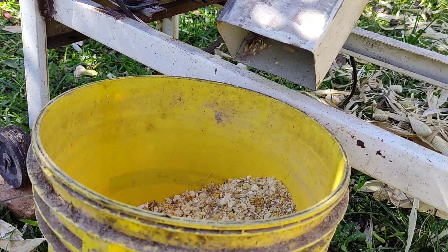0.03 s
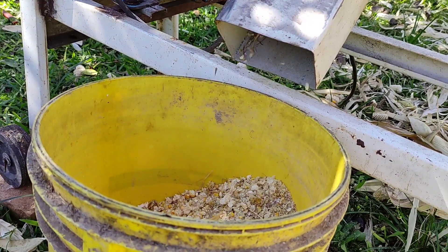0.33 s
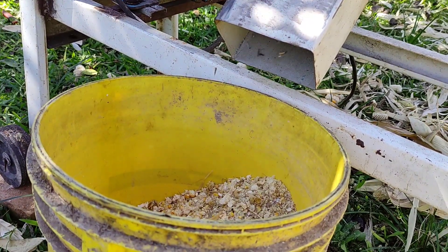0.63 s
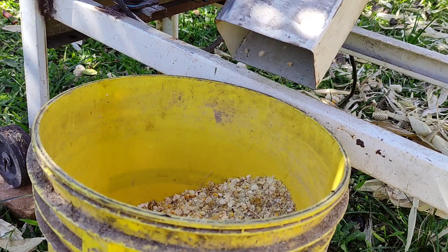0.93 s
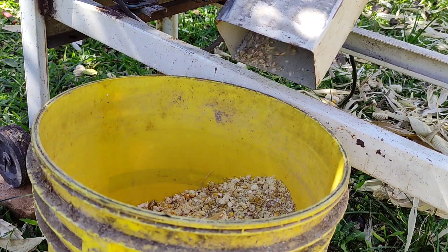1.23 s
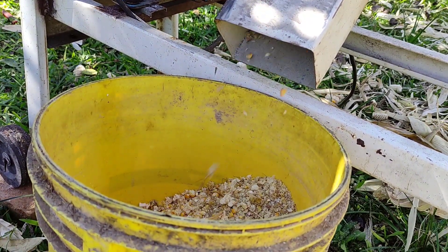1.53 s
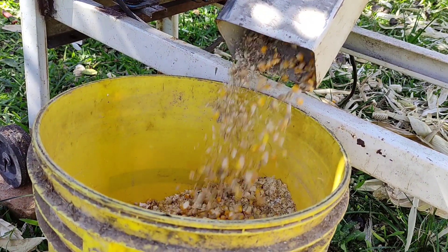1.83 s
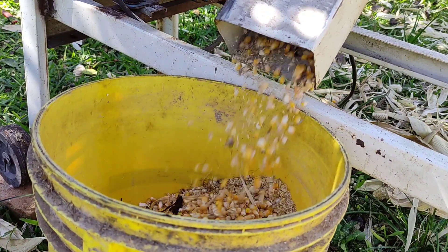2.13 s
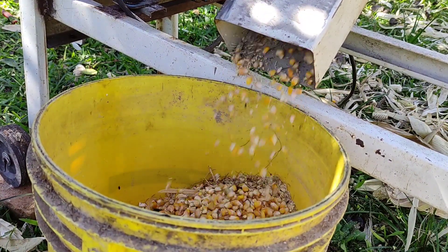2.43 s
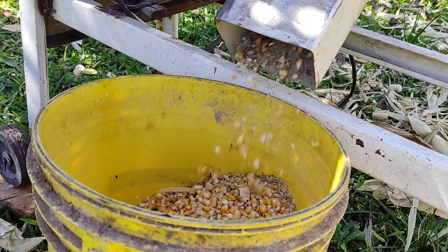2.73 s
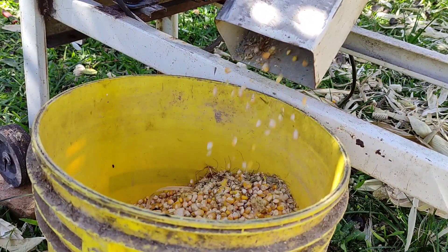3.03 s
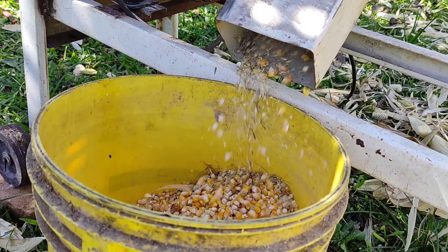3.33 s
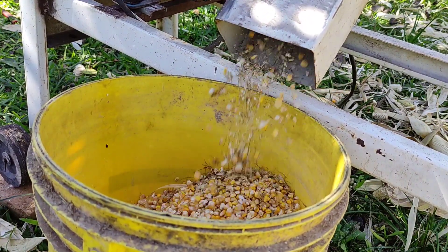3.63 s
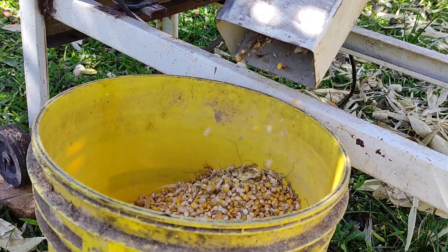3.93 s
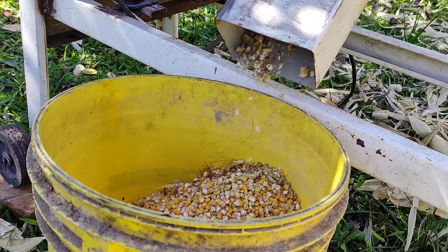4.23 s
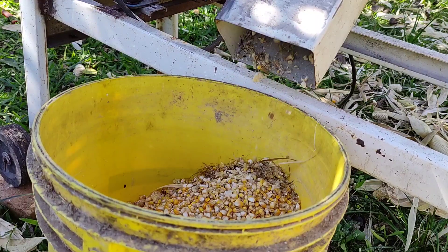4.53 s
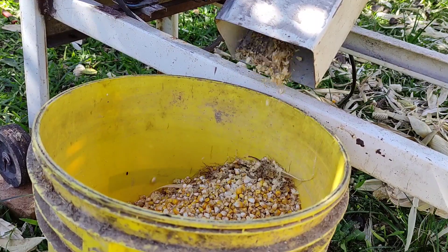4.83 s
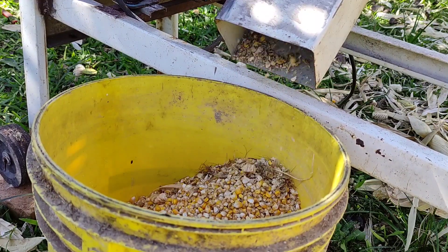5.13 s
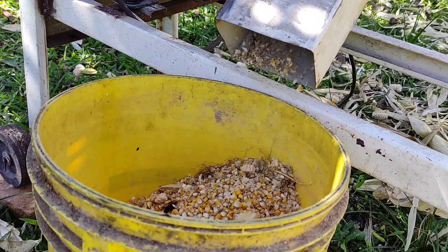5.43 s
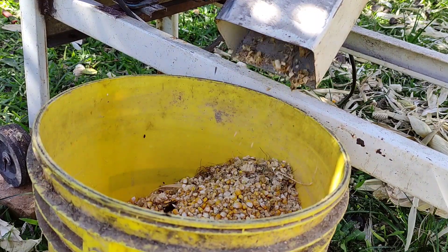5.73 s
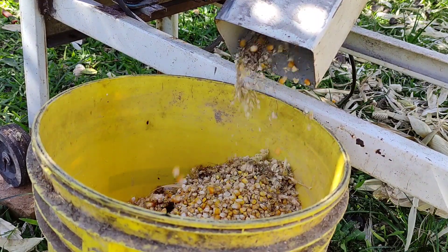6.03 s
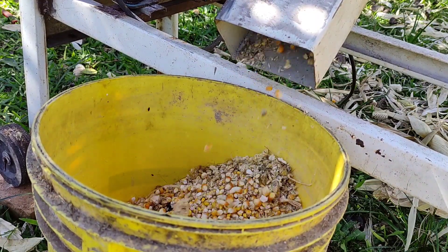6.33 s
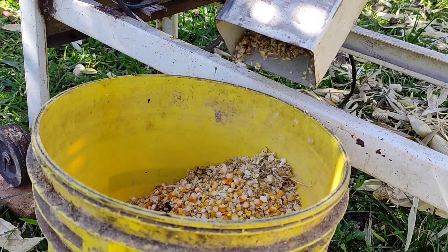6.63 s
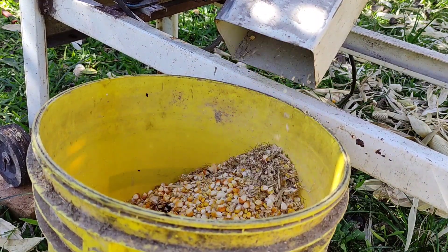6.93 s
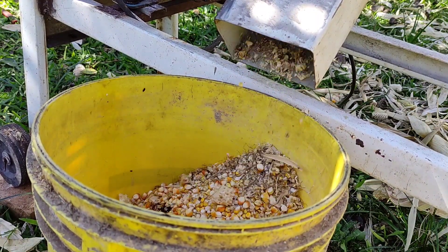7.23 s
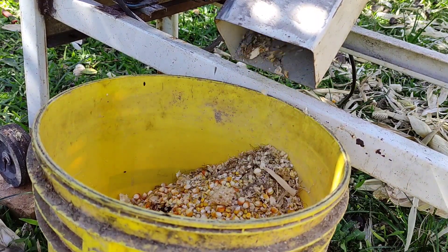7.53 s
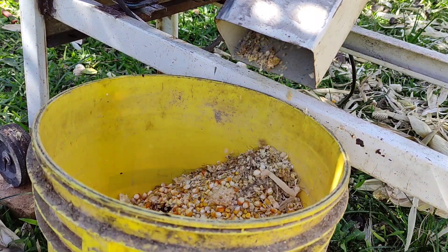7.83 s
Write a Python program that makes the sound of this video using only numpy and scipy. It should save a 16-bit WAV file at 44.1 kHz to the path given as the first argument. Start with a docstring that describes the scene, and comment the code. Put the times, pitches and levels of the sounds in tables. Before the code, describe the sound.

An engine-driven corn sheller runs outdoors, heard from close beside its chute. At first it spins nearly empty, with a fluttering roar and a whirr of sheet-metal panels. Cobs start thumping and clanking inside. Then fresh ears go through: the whirr fades, the roar briefly chokes, and kernels spray down the metal chute into a plastic bucket. More surges follow, with sharp clacks and hollow thuds over the continuing roar.

```python
"""Outdoors, the microphone close beside the chute of an engine-driven corn sheller.
At first the drum spins nearly empty, churning air through its sheet-metal housing in a fluttering roar
while the engine sets the panels whirring. From 0.4 s cobs thump inside, with hard clacks and clanks.
At 1.4 s fresh ears are stripped: grain damps the whirr, rubs the panels into song and briefly chokes
the roar. From then on, surges of kernels clatter and spray down the chute into a plastic bucket."""
import sys
import numpy as np
from scipy import signal
from scipy.fft import rfft, irfft
from scipy.io import wavfile
from scipy.ndimage import uniform_filter1d, minimum_filter1d

SR = 44100
rng = np.random.default_rng(int(sys.argv[2]) if len(sys.argv) > 2 else 0)


def store_pcm(level_fs):
    """Save levels as 16-bit WAV."""
    pcm = np.round(np.clip(level_fs, -1, 1) * 32767).astype(np.int16)
    wavfile.write(sys.argv[1], SR, np.atleast_2d(pcm).T)


N = 347067
T = np.arange(N) / SR
HZ = np.fft.rfftfreq(8192, 1 / SR)


def gain_of(db):
    """Decibels to gain."""
    return 10 ** (np.asarray(db) / 20)


def unit_rms(x):
    """Scales to rms 1."""
    return x / np.sqrt(np.mean(x ** 2) + 1e-20)


def spectrum(points):
    """Gain at every frequency, drawn through (Hz, dB) points."""
    hz, db = np.transpose(points)
    return gain_of(np.interp(np.log(HZ + 1), np.log(hz), db))


def resonance(hz, width_hz):
    """Gain of one resonance, 1 at its centre."""
    return 1 / (1 + (2 * (HZ - hz) / width_hz) ** 2)


def add(mix, start_s, sound):
    """Mixes a sound in at a given time."""
    part = mix[max(round(start_s * SR), 0):][:len(sound)]
    part += sound[:len(part)]


def ring(x, gain):
    """Minimum-phase filter with the given gain: every blow rings after it lands."""
    log_gain = np.log(np.maximum(np.r_[gain, gain[-2:0:-1]], 1e-5))
    response = np.exp(np.conj(signal.hilbert(log_gain)))
    taps = np.fft.ifft(response).real[:len(HZ)]
    return signal.oaconvolve(x, taps)[:len(x)]


def wander(hz):
    """Random drift of rms 1, up to about the given rate."""
    lowpass = np.exp(-(np.fft.rfftfreq(N, 1 / SR) / hz) ** 2)
    return unit_rms(irfft(rfft(rng.standard_normal(N)) * lowpass, N))


def flutter(depth_db, hz=43.075, crest_s=0.0083):
    """A fast, even flutter in the level, shared by air and grain."""
    return gain_of(depth_db * np.cos(2 * np.pi * hz * (T - crest_s)))


def impacts(per_s, spread_db):
    """Blows of random size at random moments."""
    size = gain_of(spread_db * np.minimum(rng.exponential(1, N), 4))
    lands = rng.random(N) < per_s / SR
    return unit_rms(size * rng.choice([-1, 1], N) * lands)


def burst(body, rise_s, length_s):
    """A quick cluster of contacts ringing a body, with peak 1."""
    t = T[:SR // 4]
    envelope = (1 - np.exp(-t / rise_s)) * np.exp(-(t / length_s) ** 2)
    sound = ring(rng.standard_normal(len(t)) * envelope, body)
    return sound / abs(sound).max()


def strike(rows, body, rise_s, length_s):
    """One burst for each row that begins with a start in seconds and a level in dB."""
    out = np.zeros(N)
    for start_s, db, *_ in rows:
        add(out, start_s, gain_of(db) * burst(body, rise_s, length_s))
    return out


# The housing's resonances. Each row: frequency in Hz, width in Hz, relative level in dB.
HOUSING_MODES = [(110, 55, -18), (253.5, 61, 1), (297, 50, -1), (356.4, 80, -7), (497, 91, -10),
                 (598.4, 80, -5.5), (677, 100, -8), (759, 67, -10), (883, 123, -7), (973, 62, -13.5),
                 (1160, 150, -19)]

def housing():
    """Gain of the booming sheet-metal housing: its resonances add in power."""
    return np.sqrt(sum((gain_of(db) * resonance(hz, width)) ** 2 for hz, width, db in HOUSING_MODES))


# The rush of air between the resonances. Each row: frequency in Hz, relative level in dB.
AIR_SPECTRUM = [(20, -55), (45, -35), (75, -12.5), (170, -11), (450, -11.5), (900, -15), (1060, -21),
                (1400, -23), (2000, -27), (3200, -42.5), (7500, -47.5)]

def drum(open_share, drone_db=-31, roar_db=-23.12, split_hz=340):
    """The drum churns air through the housing: a low drone, and above it a roar that grain can choke."""
    body = np.hypot(housing(), spectrum(AIR_SPECTRUM))
    low_share = 1 / (1 + (HZ / split_hz) ** 8)
    churn = rng.standard_normal(N) * flutter(depth_db=4)
    drone = unit_rms(ring(churn, body * np.sqrt(low_share)))
    puffs = impacts(per_s=3500, spread_db=2) * flutter(depth_db=1) * gain_of(0.97 * wander(hz=40))
    roar = unit_rms(ring(puffs, body * np.sqrt(1 - low_share)))
    return gain_of(drone_db) * drone + gain_of(roar_db) * open_share * roar


# Tones of the empty drum. Each row: frequency in Hz, width in Hz, level in dB.
DRUM_TONES = [(105, 54, -40), (269, 34, -32.5), (375, 33, -33), (640, 38, -45.5), (875, 27, -41.5),
              (1080, 70, -54.5), (7170, 230, -57)]

def hum(fill):
    """The nearly empty drum hums and whistles in narrow, wavering tones until grain damps them."""
    tones = sum(gain_of(db) * unit_rms(ring(rng.standard_normal(N), resonance(hz, width)))
                for hz, width, db in DRUM_TONES)
    return tones * (1 - fill) ** 2


# The engine sags as the ears go in. Each row: time in seconds, firings per second.
FIRING_RATE = [(0, 65.7), (.35, 64.8), (.75, 65.05), (.9, 63.7), (1.17, 64.1), (1.37, 64.9), (1.5, 63)]
# Tones shaken from the empty housing. Each row: multiple of the firing rate, level in dB.
WHIRR_ORDERS = [(4, -31.5), (6, -39.5), (9, -35.5), (10, -39.5), (12, -34), (13, -42), (14, -36.5)]

def whirr(fill, waver_db=1.4, slip_rad=0.4):
    """The engine shakes loose panels at multiples of its firing rate until grain weighs them down."""
    firing_phase = 2 * np.pi * np.cumsum(np.interp(T, *np.transpose(FIRING_RATE))) / SR
    tones = np.zeros(N)
    for order, db in WHIRR_ORDERS:
        waver = gain_of(waver_db * wander(hz=9))
        phase = order * firing_phase + slip_rad * wander(hz=30)
        tones += gain_of(db) * unit_rms(waver * np.sin(phase))
    return tones * (1 - fill) ** 2


def cob_blow(soft_hz, low_hz):
    """Gain of the housing under a soft cob, which drives mainly the low panel resonance."""
    softness = 1 / np.sqrt(1 + (HZ / soft_hz) ** 4)
    low_cut = HZ ** 2 / (HZ ** 2 + low_hz ** 2)
    return housing() * softness * low_cut


def tumbling_cobs(loudness, open_share, level_db=-29.5):
    """Cobs rumble round inside the drum, cushioned a little by a heavy flow of grain."""
    rumble = unit_rms(ring(impacts(per_s=350, spread_db=1.5), cob_blow(soft_hz=278, low_hz=270)))
    return gain_of(level_db) * loudness * open_share ** 0.13 * rumble


# Kernels striking sheet steel. Each row: frequency in Hz, relative level in dB.
STEEL_SPECTRUM = [(150, -25), (450, 3.5), (900, 1.5), (1060, 0.5), (1250, 1.5), (1480, -2.5), (1850, -2),
                  (2350, -6), (2900, -11), (3500, -15), (5000, -20), (7500, -16)]
# Kernels and chaff skittering over each other. Each row: frequency in Hz, relative level in dB.
SKITTER_SPECTRUM = [(500, -20.5), (1300, -15.5), (1580, -2), (1900, -7.5), (2300, 2), (2600, -0.5),
                    (2900, -4), (3400, -2.5), (4300, -5), (5500, -1.5), (6500, 0.5), (7500, 3.5)]

def kernels(loudness, flow, fill):
    """Kernels leave the drum in clumps, strike the steel and skitter down the chute close by."""
    clumps = gain_of(1.55 * wander(hz=34) * fill)
    strikes = impacts(per_s=6000, spread_db=1.9) * flutter(depth_db=1.44) * clumps
    grazes = impacts(per_s=6000, spread_db=-0.5) * flutter(depth_db=1.7) * clumps
    clatter = unit_rms(ring(strikes, spectrum(STEEL_SPECTRUM)))
    spray = unit_rms(ring(grazes, spectrum(SKITTER_SPECTRUM)))
    return loudness * gain_of(-32.5 + 7 * fill) * clatter + flow * gain_of(8.5 + 2 * fill) * spray


def bucket(flow, body_hz=140, level_db=-33, heap_db_per_s=1.47):
    """The stream of grain drums dully on the chute and the plastic bucket, less as the heap grows."""
    body = np.minimum(HZ / body_hz, 1) * resonance(body_hz, width_hz=150)
    level = gain_of(level_db - heap_db_per_s * T) * (flow / flow.max()) ** 0.33
    return level * unit_rms(ring(impacts(per_s=900, spread_db=1.5), body))


# The largest handfuls of kernels. Each row: start in seconds, clack level in dB, splash level in dB.
HANDFULS = [(.423, -28, -33), (.724, -21, -38), (.749, -20, -38), (1.462, -22, -16), (2.325, -16, -25),
            (2.492, -24, -19), (2.649, -15, -26), (2.93, -22, -18.5), (3.79, -17, -30), (3.977, -15.5, -22),
            (4.182, -16, -29), (4.212, -16, -25), (4.25, -12, -20), (4.324, -10.5, -20.5),
            (4.415, -16, -24), (4.572, -12.5, -25), (4.792, -15, -22), (4.829, -15.5, -28),
            (4.855, -11, -24), (4.995, -15, -21), (5.16, -16.5, -22), (5.319, -7.7, -20),
            (5.502, -15.5, -28), (5.604, -12.5, -23), (5.645, -13, -25), (5.761, -15, -21),
            (6.041, -13.5, -23), (6.084, -17, -22), (6.296, -15, -23), (6.718, -12.5, -25),
            (6.811, -8.7, -18), (6.854, -13.5, -24), (6.973, -13, -28), (7.342, -16, -24),
            (7.361, -15, -21), (7.384, -13.5, -21.5), (7.548, -14, -22), (7.574, -13, -21),
            (7.792, -15.5, -26)]

def handfuls(snap_db=-8, scatter_db=-17):
    """A handful of kernels hits the steel: a snap, a clack, a bright splash, then scattering rebounds."""
    steel, skitter = spectrum(STEEL_SPECTRUM), spectrum(SKITTER_SPECTRUM)
    bright_steel = steel * (1 + 0.25 * resonance(1900, width_hz=1800))
    splashes = [(start_s, db) for start_s, _, db in HANDFULS]
    snap = strike(HANDFULS, np.hypot(bright_steel, 0.45 * skitter), rise_s=0.0001, length_s=0.0012)
    clack = strike(HANDFULS, bright_steel, rise_s=0.0005, length_s=0.012)
    splash = strike(splashes, skitter, rise_s=0.0003, length_s=0.014)
    scatter = strike(HANDFULS, steel, rise_s=0.0061, length_s=0.07)
    return gain_of(snap_db) * snap + clack + splash + gain_of(scatter_db) * scatter


# Hard blows on the housing. Each row: start in seconds, level in dB.
HARD_BLOWS = [(.426, -11), (1.139, -12), (1.187, -11.5), (1.797, -15), (2.089, -10), (2.707, -11),
              (3.979, -10.5), (4.555, -11), (4.742, -8), (5.764, -9), (6.81, -8.5), (6.969, -10)]

def clanks(low_hz=480, high_hz=1000):
    """Short hard blows ring the housing's upper resonances."""
    band = 1 / np.sqrt(1 + (low_hz / (HZ + 1)) ** 6 + (HZ / high_hz) ** 10)
    return strike(HARD_BLOWS, np.hypot(housing(), 0.25) * band, rise_s=0.0002, length_s=0.004)


# Cobs hitting the wall. Each row: start in seconds, boom level in dB, pitch in Hz, ring in seconds.
COB_THROWS = [(0.436, -15.5, 273, 0.026), (0.693, -14, 257, 0.023), (0.851, -17, 258, 0.041),
              (1.551, -13, 254, 0.02), (1.764, -20, 267, 0.018), (2.143, -12, 258, 0.0082),
              (2.501, -19.5, 263, 0.024), (2.666, -11, 260.4, 0.022), (2.803, -12, 253, 0.02),
              (2.83, -16, 258, 0.02), (2.868, -17, 276, 0.013), (3.436, -11.5, 287, 0.022),
              (3.508, -11.5, 259, 0.019), (3.548, -17, 280, 0.028), (3.943, -12.5, 260, 0.027),
              (4.058, -15, 265, 0.02), (4.153, -23, 263, 0.022), (4.208, -16, 268, 0.018),
              (4.324, -10.5, 262, 0.016), (4.507, -15.5, 257, 0.023), (4.574, -11.5, 252, 0.033),
              (4.598, -17.5, 258, 0.023), (4.959, -12.5, 264, 0.02), (5.322, -14, 275, 0.013),
              (5.379, -16, 259, 0.021), (5.534, -13.5, 267, 0.014), (5.765, -21, 254, 0.017),
              (6.406, -21, 286, 0.015), (6.682, -12.5, 268, 0.012), (6.81, -10.5, 261, 0.018),
              (6.964, -16, 257, 0.017), (7.143, -18, 256, 0.042), (7.468, -11, 252, 0.028),
              (7.795, -13, 256, 0.016)]

def thrown_cobs(thud_db=-6.5, swell_s=0.0043):
    """A cob thrown hard against the housing thuds and sets a panel booming."""
    thuds = strike(COB_THROWS, cob_blow(soft_hz=520, low_hz=220), rise_s=0.00053, length_s=0.0081)
    t, booms = T[:SR // 6], np.zeros(N)
    for start_s, db, hz, ring_s in COB_THROWS:
        swing = (1 - np.exp(-t / swell_s)) * np.exp(-(t / ring_s) ** 2)
        add(booms, start_s, gain_of(db) * swing / swing.max() * np.sin(2 * np.pi * hz * t))
    return gain_of(thud_db) * thuds + booms


# Panels that grain rubs along. Each row: pitch in Hz, level in dB for a full drum, pitch waver in Hz.
PANEL_TONES = [(257, -32, 9), (593, -36, 10)]

def rubbed_panels(fill, swell_db=1.5):
    """Panels rubbed by grain sing at a wavering pitch, louder as the drum fills."""
    tones = np.zeros(N)
    for hz, db, waver_hz in PANEL_TONES:
        level = gain_of(db + swell_db * wander(hz=8))
        phase = 2 * np.pi * np.cumsum(hz + waver_hz * wander(hz=18)) / SR
        tones += level * unit_rms(np.sin(phase))
    return fill * tones


def ticks(fill, spots=10, per_s=45, full_db=-41.5):
    """Single kernels tick on the chute and the bucket close by, each spot with its own short ring."""
    out = np.zeros(N)
    for hz in np.geomspace(1700, 5200, spots):
        body = resonance(hz, width_hz=hz / 3) + 0.6 * spectrum(SKITTER_SPECTRUM)
        tick = burst(body, rise_s=0.0001, length_s=0.004)
        hits = rng.uniform(0.54, 1, N) * (rng.random(N) < per_s / spots / SR)
        out += signal.oaconvolve(hits, tick)[:N]
    return gain_of(full_db) * fill * unit_rms(out)


# Batches of ears being stripped. Each row: start, rise, hold and drain in seconds, then flow in dB.
BATCHES = [(1.386, 0.048, 0.56, 0.84, -30.5), (2.79, 0.11, 0.46, 0.68, -35),
           (5.56, 0.09, 0.47, 0.68, -38.5), (7.327, 0.037, 0.042, .037, -37.5),
           (7.53, 0.046, 0.043, .05, -38)]

def kernel_flow(fill, empty_db=-49.5, full_db=-44.5, spurt_db=4.5):
    """Each batch releases a surge of kernels over a trickle that grows and spurts as the drum fills."""
    trickle = gain_of(empty_db + fill * (full_db - empty_db + spurt_db * wander(hz=14)))
    power = trickle ** 2
    for start_s, rise_s, hold_s, drain_s, db in BATCHES:
        age = T - start_s
        surge = np.clip(age / rise_s, 0, 1) * np.exp(-np.maximum(age - hold_s, 0) / drain_s)
        power += (gain_of(db) * surge) ** 2
    return np.sqrt(power)


def chute_opening(flow, half_power_flow_db=-32, lag_s=0.058, steepness=5.1):
    """Share of the roar that gets past the grain: a heavy flow blocks the air a moment later."""
    decay = np.exp(-1 / (lag_s * SR))
    blockage = signal.lfilter([1 - decay], [1, -decay], flow) / gain_of(half_power_flow_db)
    return 1 / np.sqrt(1 + blockage ** steepness)


# Brief dips and swells in the level of the roar, tones and clatter. Each row: time in seconds, gain in dB.
LOUDNESS = [(0, -0.8), (.92, -0.4), (1.06, -2.5), (1.2, -0.1), (1.42, -0.3), (2.25, 1), (2.5, -0.5),
            (2.75, 2.5), (3.05, 1), (4.05, 0.64), (4.51, 1.5), (4.54, -2.5), (4.57, 1.8), (4.8, 0.9),
            (5.6, 0.7), (7.1, 0.3), (7.87, 1)]
# How full the drum is. Each row: time in seconds, share from 0 to 1.
DRUM_FILL = [(1.375, 0), (1.44, 0.52), (2.2, 0.4), (4.6, 0.67)]

def scene():
    """The sheller from beside its chute: the level dips and swells as the drum fills and grain flows."""
    loudness = gain_of(np.interp(T, *np.transpose(LOUDNESS)))
    fill = np.interp(T, *np.transpose(DRUM_FILL))
    flow = kernel_flow(fill)
    open_share = chute_opening(flow)
    machine = loudness * (drum(open_share) + hum(fill) + whirr(fill) + rubbed_panels(fill))
    knocks = tumbling_cobs(loudness, open_share) + thrown_cobs() + clanks()
    grain = kernels(loudness, flow, fill) + handfuls() + ticks(fill) + bucket(flow)
    return (machine + knocks + grain)[None]


def record(dry, hollow_db=-5.5, hollow_from_hz=3600, hollow_to_hz=5860, ceiling=0.38, top_hz=7560):
    """The sound is hollow in the low treble; a fast limiter holds the peaks and the top is cut off."""
    hollow = gain_of(hollow_db * ((HZ > hollow_from_hz) & (HZ < hollow_to_hz)))
    coloured = ring(dry[0], uniform_filter1d(hollow, size=20))
    allowed_gain = ceiling / np.maximum(abs(coloured), ceiling)
    limiter_gain = uniform_filter1d(minimum_filter1d(allowed_gain, size=45), size=45)  # about 1 ms
    lowpass = signal.firwin(1023, top_hz, window=("kaiser", 9), fs=SR)
    return signal.oaconvolve(coloured * limiter_gain, lowpass, "same")[None]


dry = scene()
out = record(dry)
store_pcm(out)
```